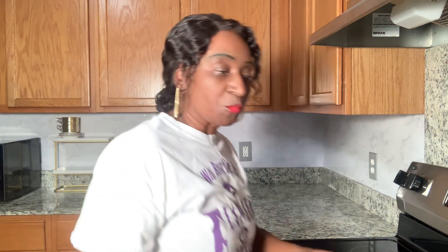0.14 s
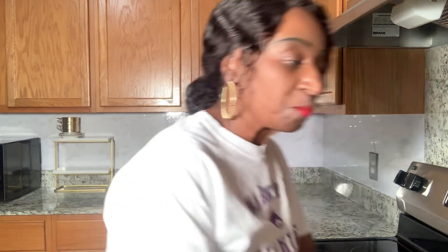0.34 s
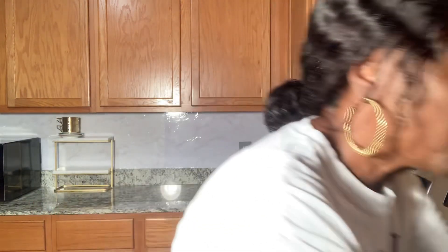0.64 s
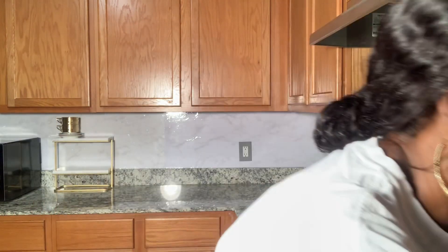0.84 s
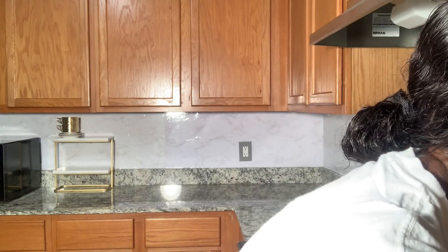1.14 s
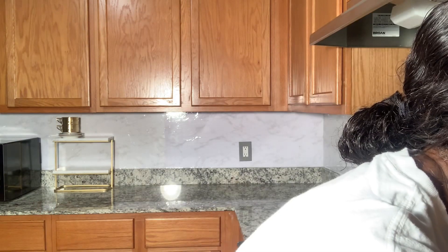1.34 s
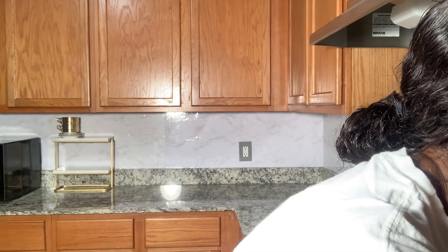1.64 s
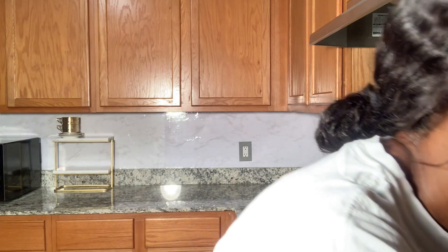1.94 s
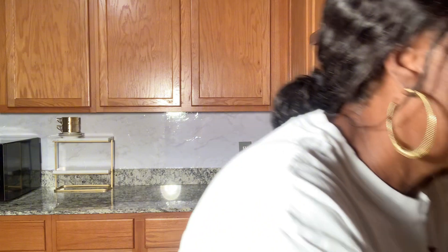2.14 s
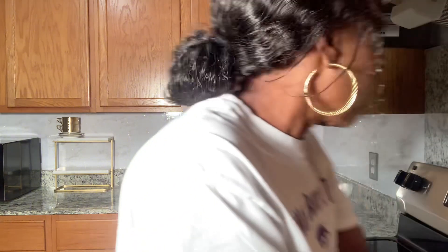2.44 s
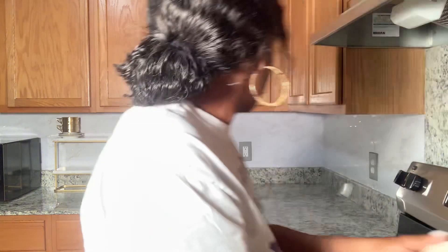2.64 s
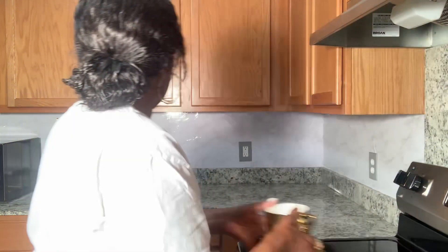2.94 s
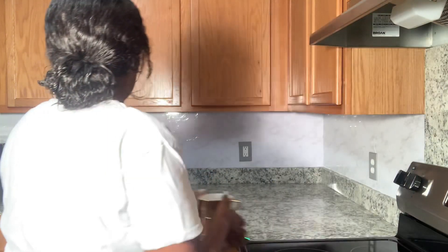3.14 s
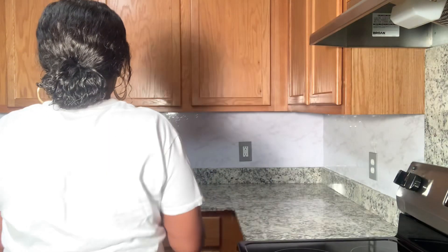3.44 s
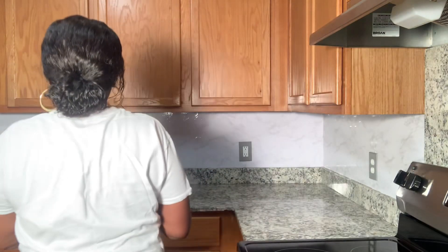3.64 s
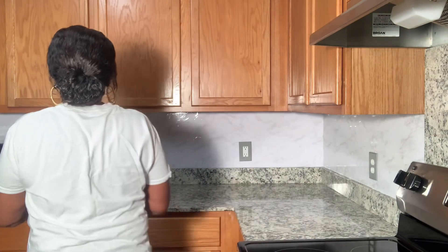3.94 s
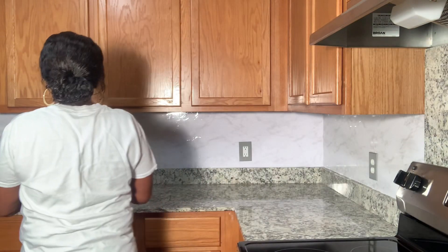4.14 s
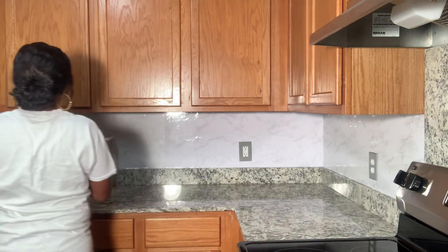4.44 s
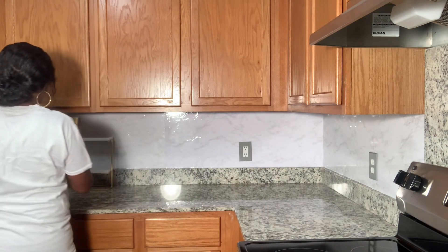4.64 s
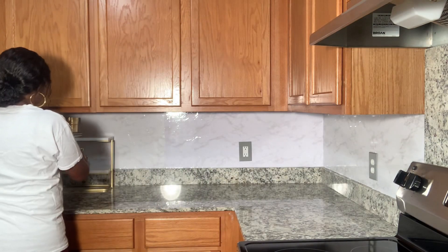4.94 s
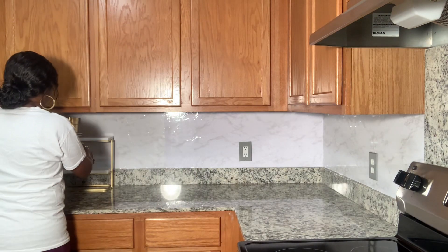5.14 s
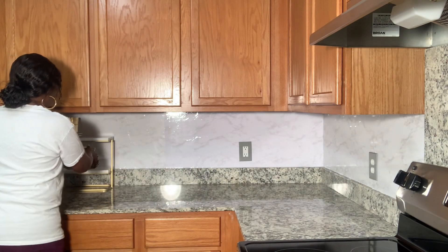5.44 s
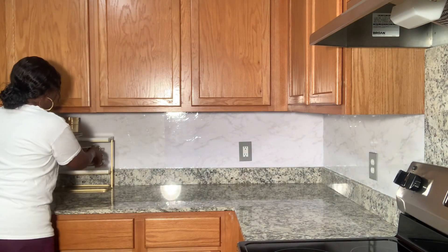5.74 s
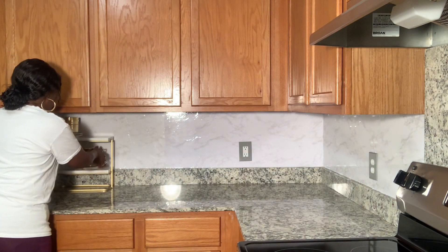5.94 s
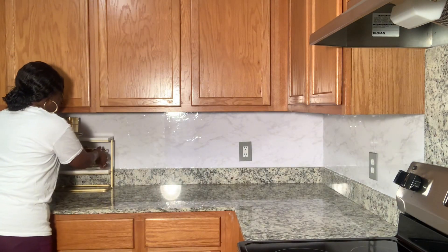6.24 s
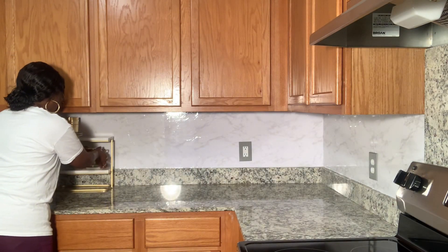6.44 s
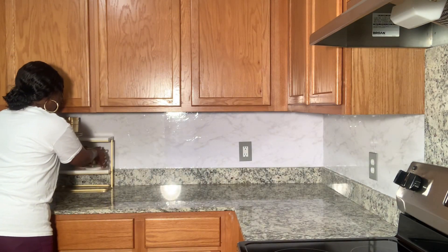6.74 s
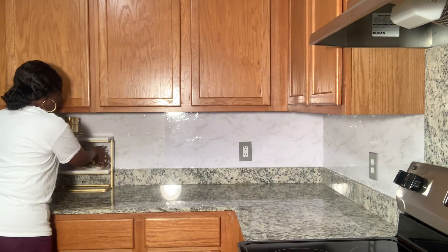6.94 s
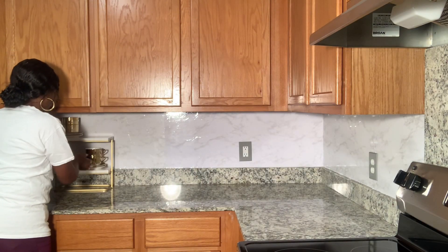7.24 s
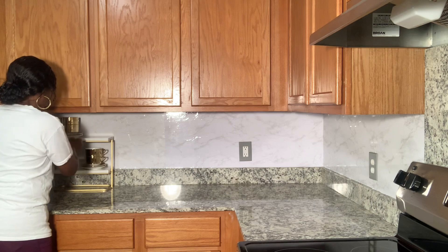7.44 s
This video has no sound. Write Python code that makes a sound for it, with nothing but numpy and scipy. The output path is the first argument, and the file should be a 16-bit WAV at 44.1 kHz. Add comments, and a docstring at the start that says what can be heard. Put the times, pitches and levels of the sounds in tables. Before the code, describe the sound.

Close to a fixed microphone in a small, quiet kitchen, a few dull heel knocks and soft scuffs come with low thuds shaking its support. Cups then clack hard and brightly in a low cupboard. After a lull, gritty slippers shuffle over the hard floor, and finally cups land on a metal stand with a sharp clink and smaller taps.

```python
"""Cups carried across a kitchen

Someone in slippers lifts cups from a low cupboard, shuffles across a hard floor and sets them on a metal stand.
Cups and heels are short blows that make crowds of decaying tones ring; soles scuff as shaped, filtered noise.
The first steps shake the microphone's support as low swaying tones, and a rim rings lightly at the stand.
Noise makes a hush and a low hum that fill the room, and sparse reflections follow the blows and the feet."""
import sys
import numpy as np
from scipy import signal
from scipy.fft import rfft, irfft, next_fast_len
from scipy.io import wavfile
from scipy.ndimage import uniform_filter1d

SR = 44100
rng = np.random.default_rng(int(sys.argv[2]) if len(sys.argv) > 2 else 0)


def master_out(mix):
    """Clip the mix to full scale and print it as 16-bit PCM to the path in sys.argv[1]."""
    frames = np.transpose(np.atleast_2d(mix))
    ceiling = np.clip(frames, -1, 1)
    pcm = np.round(ceiling * 32767).astype(np.int16)
    wavfile.write(sys.argv[1], SR, pcm)


N = 335160  # length in samples, 7.6 s

# Strokes of a sliding sole: (full level reached at [s], build-up [s], slide [s], level [dB], low drag against
# the rub [dB], fine grit against the rub [dB]); the row at 0.32 s is instead the noisy tail of the heel knock
# there
SOLE_STROKES = [(.13, 0.015, .16, -60.5, 7.5, 0.5), (.32, 0.0074, 0.0033, -46.5, 8, -24),
                (0.481, 0.032, 0.01, -63.5, 14, -24), (.26, .03, 0.016, -60, -12, -10),
                (.79, 0.13, .08, -64.5, 3, 4), (0.938, 0.007, .002, -58, 0, -7),
                (1.201, 0.14, 0.084, -74, 13, -16), (1.908, 0.048, 0.077, -58.5, 0, 4),
                (2.46, 0.34, .12, -72, -8, -10.5), (2.65, 0.13, 0.034, -64.5, -14, -10),
                (2.89, 0.019, .02, -51, 1, -1), (2.933, 0.026, 0.033, -39.5, -11.5, 1),
                (2.999, 0.023, 0.019, -43.5, -12, -6), (3.32, 0.11, 0.079, -55, -3, -7.5),
                (3.475, 0.012, 0.021, -45, -9, -0.5), (3.502, .03, .04, -41, -12.5, -8.5),
                (3.63, 0.037, .005, -46, -10.5, -5.5), (3.66, .02, 0.18, -57.5, -1, -5),
                (3.92, 0.13, 0.059, -48, -1, -5), (4.148, 0.025, 0.0038, -42, -17, -6),
                (4.23, 0.055, 0.0039, -40.5, -11.5, -6), (4.49, 0.082, 0.042, -44, -13, -1.5),
                (4.599, 0.017, 0.031, -54.5, 2, -2), (4.878, 0.014, 0.016, -55, 8.5, 5),
                (4.916, 0.034, 0.054, -42, -8.5, -4), (5.09, 0.089, 0.18, -59.5, -2, -5),
                (5.21, .05, 0.03, -60, 3, -0.5), (5.27, .03, 0.0045, -55, 1.5, -5),
                (5.444, 0.02, 0.06, -55, 0.5, 1)]


def gain_of(db):
    """Turns decibels into a factor."""
    return 10 ** (np.asarray(db) / 20)


def evened(x):
    """Scales a signal to an rms of one."""
    return x / np.sqrt(np.mean(x ** 2) + 1e-20)


def read(points, hz):
    """Reads a curve of (frequency, value) points between its points, on a log-frequency axis."""
    f, value = np.transpose(points)
    return np.interp(np.log(hz + 1), np.log(f + 1), value)


def add(mix, s, sound):
    """Mixes a sound in at s seconds, cut off at the end of the mix."""
    part = mix[round(s * SR):][:len(sound)]
    part += sound[:len(part)]


def resonate(x, hz, width):
    """Favours one pitch: shifts it down to zero, smooths, and shifts back; width is in Hz."""
    turn = np.exp(2j * np.pi * hz * np.arange(len(x)) / SR)
    r = np.exp(-np.pi * width / SR)
    smooth = signal.lfilter([1 - r], [1, -r], x / turn)
    return 2 * (turn * smooth).real


def coloured(x, points):
    """Gives x a spectrum of (frequency [Hz], level [dB]) points and an rms of one."""
    size = next_fast_len(len(x))
    gains = gain_of(read(points, np.fft.rfftfreq(size, 1 / SR)))
    return evened(irfft(rfft(x, size) * gains, size)[:len(x)])


def strikes(events, modes, dull_hz, sharp_hz, minor_db, minor_t60, rise, chatter_db, chatter_t60,
            count=240, size=8):
    """A blow is a few tiny impacts spread over the contact time, each waking some modes, then a faint chatter.

    A crowd of minor modes rings beside the main ones; each blow favours low modes, high ones, or one group.
    Here rise and chatter_t60 are in s, and minor_t60 is a share of the main modes' ring time."""
    out, t = np.zeros(N), np.arange(SR // 3) / SR
    hz, db, t60 = np.transpose(modes)
    # minor modes: evenly spaced on a square-root scale, slightly scattered
    minor_hz = np.linspace(np.sqrt(hz[0]), np.sqrt(hz[-1]), count) ** 2
    minor_hz *= np.exp(.004 * rng.standard_normal(count))
    db = np.r_[db, read(np.c_[hz, db], minor_hz) + minor_db]
    t60 = np.r_[t60, read(np.c_[hz, t60], minor_hz) * minor_t60]
    hz = np.r_[hz, minor_hz]

    soft_start = 1 - np.exp(-t / rise)
    decay = np.exp(-np.log(1000) * t / t60[:, None])
    rings = decay * np.sin(2 * np.pi * hz[:, None] * t) * soft_start / np.linalg.norm(gain_of(db))
    grit = rng.standard_normal((len(events), len(t)))
    chance = rng.random((len(events), 2, len(hz)))
    for event, g, (flip, pick) in zip(events, grit, chance):
        s, level_db, dull_db, sharp_db, best_hz, lift_db, contact, damp_db = event
        middle_hz = np.sqrt(dull_hz * sharp_hz)
        lean_db = read([(dull_hz, dull_db), (middle_hz, 0), (sharp_hz, sharp_db)], hz)
        lean_db += lift_db * np.exp(-(np.log(hz / best_hz) / 0.13) ** 2)
        weight = np.sign(flip - .5) * gain_of(level_db + db + lean_db)
        # every mode belongs to one randomly picked impact
        belongs = np.floor(pick * size) == np.arange(size)[:, None]
        impacts = (weight * belongs) @ rings * gain_of(-damp_db * t)
        for k, ring in enumerate(impacts):
            add(out, s + contact * k / size, ring)
        chatter = g * gain_of(-60 * t / chatter_t60) * np.minimum(t / max(contact, 1e-3), 1)
        chatter /= np.linalg.norm(chatter)
        add(out, s, gain_of(chatter_db) * signal.fftconvolve(chatter, impacts.sum(0)))
    return out


def cupboard_lifts():
    """Cups knock in the cupboard, ringing shelf and stacked cups while a hand damps them."""
    # knocks: (time [s], level [dB], dull end [dB], sharp end [dB], favoured pitch [Hz], its lift [dB],
    # contact [s], hand damping [dB/s])
    lift_blows = [(1.263, -15.5, -4, 10, 6000, 6.5, .011, 70),
                  (1.29, -42, -15.5, -3, 2000, -5.5, 0.011, 90),
                  (1.303, -17.5, 5.5, 12.5, 13700, 11, 0.016, 100),
                  (1.385, -38.5, 1.5, -4, 1763, 5, .03, 20), (1.426, -9, -18, -10, 4000, 5.5, 0.0062, 130),
                  (1.431, -5, -6, -14.5, 1730, 0, 0.0072, 110),
                  (1.457, -15.5, -13.5, -18, 3700, 16, 0.0079, 44),
                  (1.623, -36, -12, -22, 1730, -5, 0.0096, 15), (1.745, -53, -2, -22, 1670, 6, 0.0084, 8),
                  (2.026, -36, -21, -46, 1040, 11, 0.0084, 94)]
    # ringing modes of shelf and stacked cups: (frequency [Hz], level [dB], time to fall 60 dB [s])
    shelf_modes = [(166, -6, .14), (250, -22, .1), (366, 3, .11), (528, -14, .1), (944, -18, .1),
                   (1039, -11, .1), (1187, -15, .1), (1400, -17, .1), (1597, -10, .08), (1725, -4, .08),
                   (1790, -11, .15), (1939, -9, .1), (2255, -15, .1), (2510, -16, .1), (2850, -18, .1),
                   (3200, -34, .1), (3640, -20, .12), (4200, -20, .15), (4400, -22, .15), (5240, -32, .12),
                   (5950, -26, .05), (6450, -28, .2), (7900, -60, .1), (9636, -44, .4), (10940, -36, .1),
                   (12500, -52, .1), (13290, -40, .25), (13850, -36, .2), (14050, -37, .2),
                   (15200, -52, .1)]
    return strikes(lift_blows, shelf_modes, dull_hz=400, sharp_hz=6000, minor_db=-7.5, minor_t60=1.0,
                   rise=0.00045, chatter_db=-9.5, chatter_t60=0.27)


def stand_sets():
    """Cups land on the metal stand, and cup and stand ring together."""
    # landings: (time [s], level [dB], dull end [dB], sharp end [dB], favoured pitch [Hz], its lift [dB],
    # contact [s], hand damping [dB/s])
    set_blows = [(6.112, -17.5, -3.5, -2.5, 1584, 1, 0.0068, 210),
                 (6.121, -8, -3.5, 2.5, 1520, 4, 0.0039, 200), (6.138, -15, 0, -3, 1600, -4, .005, 195),
                 (6.256, -29.5, 2.5, 1, 1570, -2, 0.0043, 25), (6.27, -33, 8.5, -18, 2670, 15, .008, 5),
                 (6.38, -55, 7, -8.5, 1500, 2, 0.056, 3), (6.5, -54, -1, 1.5, 1910, 13, 0.058, 3.3),
                 (6.566, -28, -3, -5.5, 1480, -12.5, .015, 85), (6.6, -44, 8.5, -10, 3750, 4.5, 0.047, 4.4),
                 (6.678, -48.5, 4.5, -11.5, 1410, 11, .01, 6), (6.815, -50.5, 2.5, -19, 1100, 10, .02, 8),
                 (6.94, -32.5, 1.5, -7, 1650, -9, 0.0049, 99), (6.98, -49, 13, -9, 1910, -3, .05, 5)]
    # ringing modes of cup and stand: (frequency [Hz], level [dB], time to fall 60 dB [s])
    stand_modes = [(407.7, -21, 0.15), (742, -23, 0.32), (898, -17.5, 0.13), (1100, -15.5, 0.18),
                   (1283, -15, .12), (1460, -4, .15), (1531, -5, .13), (1611, -3, .09), (1670, -2, .08),
                   (1747, -8, .15), (1957, -14, .13), (2040, -15, .12), (2229, -22, .12), (2772, -13, .15),
                   (2955, -10, .17), (3290, -12, .15), (3536, -10, .16), (3675, -12, .16), (4060, -17, .15),
                   (4500, -22.5, .15), (5000, -34, 0.12), (6314, -25.5, .15), (6440, -45.5, 0.72),
                   (6720, -31.5, 0.087), (7100, -50.5, 0.081), (8900, -52.5, 0.052), (13440, -41.5, .04)]
    return strikes(set_blows, stand_modes, dull_hz=810, sharp_hz=3556, minor_db=-7, minor_t60=0.95,
                   rise=0.00062, chatter_db=-7.5, chatter_t60=0.15)


def rim_ping():
    """A lightly touched thin rim rings alone as a few soft-starting, decaying tones."""
    # tones of the rim: (frequency [Hz], level against ping_db [dB], time to fall 60 dB [s])
    rim_tones = [(5030, -10, .3), (5600, 0, .08), (5700, 1, .09), (5800, -1, .07)]
    ping_s, ping_db = 6.941, -50
    out, t = np.zeros(N), np.arange(SR // 2) / SR
    soft_start = 1 - np.exp(-t / 0.0044)
    for hz, db, t60 in rim_tones:
        loudness = gain_of(ping_db + db - 60 * t / t60)
        add(out, ping_s, loudness * soft_start * np.sin(2 * np.pi * hz * t))
    return out


def pressure(extra_db, fade_db_per_s):
    """Loudness of the strokes: each builds up, slides and fades; overlapping strokes add in power."""
    build_db = 22  # a stroke builds up from this far below its level, and from lower still before that
    power, t = np.zeros(N), np.arange(-SR // 2, SR // 2) / SR
    for (s, build, slide, level_db, *_), extra in zip(SOLE_STROKES, extra_db):
        rise_db = build_db * np.minimum(t, 0) / build
        shape_db = rise_db - fade_db_per_s * np.maximum(t - slide, 0)
        first = max(SR // 2 - round(s * SR), 0)  # skip what would come before the start
        add(power, max(s - .5, 0), gain_of(level_db + extra + shape_db)[first:] ** 2)
    return np.sqrt(power)


def scuffs():
    """Dense grit under the sole: a rub, with a low drag from weight and an airy hiss from fine grit.

    The hollow of the slipper resonates and so colours some strokes."""
    # colour of the grit under the sole: (frequency [Hz], relative level [dB])
    sole_colour = [(150, -22), (250, 5), (620, -4.5), (805, -7.5), (878, -6), (1380, -9.5), (1990, -3),
                   (4610, -3.5), (6310, -4), (7780, -12), (8790, -18.5), (11600, -14.5), (15100, -12),
                   (16200, -26)]
    # strokes where the hollow sings: (middle [s], half length [s], pitch [Hz], level over the rub [dB])
    hollow_strokes = [(0.166, 0.027, 1580, 9), (2.5, 0.19, 2900, -2.5), (2.956, 0.011, 1700, 3),
                      (3.504, 0.064, 2680, -2), (3.622, 0.018, 3240, 0.5), (3.82, 0.035, 2300, -1),
                      (3.978, 0.068, 2830, 1.5), (4.294, 0.063, 2950, -5.5), (5.28, 0.011, 1700, 6.5)]
    drag_db, grit_db = np.transpose(SOLE_STROKES)[4:]
    slips = evened(uniform_filter1d(rng.standard_normal(N), size=300))
    bursts = np.minimum(rng.exponential(1, N), 5)
    grits = rng.standard_normal((4, N)) * gain_of(1.8 * slips + 2.0 * bursts)
    layers = []
    for band, grit in zip([(250, 1500), (1500, 8800), (8800, 19000)], grits):  # Hz
        sos = signal.butter(2, band, "bandpass", fs=SR, output="sos")
        layers.append(evened(signal.sosfilt(sos, coloured(grit, sole_colour))))
    drag, rub, hiss = layers

    # the colour of the rub shifts in patches of time and pitch
    _, _, z = signal.stft(rub, SR, nperseg=512)
    patches = uniform_filter1d(rng.standard_normal(z.shape), size=8, axis=0)
    patches = evened(uniform_filter1d(patches, size=8, axis=1))
    rub = evened(signal.istft(z * gain_of(2.7 * patches), SR, nperseg=512)[1][:N])

    for middle, half, hz, share_db in hollow_strokes:
        # twice the half length, as the smooth window fades at both ends
        span = slice(round((middle - 2 * half) * SR), round((middle + 2 * half) * SR))
        sung = evened(resonate(resonate(grits[3, span], hz, 300), hz, 480))
        add(rub, middle - 2 * half, gain_of(share_db) * sung * np.hanning(len(sung)))

    # after the slide the hiss dies first, the drag last
    sound = pressure(np.zeros(len(SOLE_STROKES)), fade_db_per_s=220.5) * rub
    sound += pressure(drag_db, fade_db_per_s=147.5) * drag
    return sound + pressure(grit_db, fade_db_per_s=379.5) * hiss


def snaps():
    """Single grains snap under the sole, each a bright noise click about a millisecond long."""
    # snapping grains: (time [s], level [dB])
    grain_snaps = [(2.929, -19.5), (3.47, -38), (4.139, -34), (4.437, -43), (4.487, -19), (4.539, -35)]
    out, t = np.zeros(N), np.arange(400) / SR
    for (s, db), grit in zip(grain_snaps, rng.standard_normal((len(grain_snaps), 400))):
        click = np.diff(np.sign(grit) * np.exp(-t / 0.00068), prepend=0) / 2  # differences favour treble
        add(out, s, gain_of(db) * click)
    return out


def heel_knocks():
    """Heels and small bumps knock on the hard floor with short, dull rings."""
    # knocks: (time [s], level [dB], dull end [dB], sharp end [dB], favoured pitch [Hz], its lift [dB])
    heel_blows = [(.129, -31, -17, 1, 1790, 11), (.163, -23.5, -2.5, -3, 394, -4),
                  (.319, -21, 0.5, 13.5, 1250, 5.5), (.478, -49.5, 18, -15, 484.4, 10.5),
                  (.547, -28.5, -4, 4.5, 540, 10), (.938, -28.5, -10.5, 5, 416, 16),
                  (2.884, -29.5, 3, 4, 536, 14.5), (4.184, -34, 4, -11, 430, 4.5),
                  (4.602, -27.5, -14, 2, 1250, 0), (4.637, -40, 13.5, 10, 400, -2),
                  (4.872, -23, 4.5, 13, 523, 7.5), (5.438, -28.5, 8.5, -18, 587, 8)]
    # ringing modes of heel and floor: (frequency [Hz], level [dB], time to fall 60 dB [s])
    heel_modes = [(195.5, -3.5, 0.066), (310, -12.5, 0.11), (430, 4.5, 0.023), (584, 1.5, 0.023),
                  (852, -9.5, 0.025), (1250, -4, 0.021), (1700, -13, 0.011), (2500, -16.5, 0.034),
                  (3260, -18, 0.0089), (4910, -43, 0.013), (7090, -47, 0.01), (11720, -59, 0.0086)]
    contact_s, damp_db_per_s = .007, 1.5
    events = [tuple(row) + (contact_s, damp_db_per_s) for row in heel_blows]
    return strikes(events, heel_modes, dull_hz=448, sharp_hz=2510, minor_db=-5, minor_t60=0.87,
                   rise=0.0011, chatter_db=-10.5, chatter_t60=0.2, count=120)


def support_shakes():
    """Steps make the support sway, each as one low, soft-starting tone that dies away."""
    # sways: (time [s], level [dB], pitch [Hz], time to fall 60 dB [s])
    sways = [(0.117, -33, 62, 0.33), (.155, -21, 59.2, 0.49), (0.333, -20, 62, 0.35), (.37, -19, 62, .2),
             (.49, -34, 62, 0.41), (0.55, -29.5, 62, 0.45)]
    out, t = np.zeros(N), np.arange(SR) / SR
    soft_start = 1 - np.exp(-t / 0.0028)
    for s, db, hz, t60 in sways:
        add(out, s, gain_of(db - 60 * t / t60) * soft_start * np.sin(2 * np.pi * hz * t))
    return out


def kitchen(x):
    """The room answers with sparse reflections of random sign, each band dying at its own speed."""
    # how long the room rings: (frequency [Hz], time to fall 60 dB [s])
    room_decay = [(150, 0.13), (500, 0.15), (1500, 0.5), (4000, 0.39), (8000, 0.51), (15000, 0.4)]
    taps = np.zeros(SR)
    at = np.arange(120, SR - 20, 20)
    taps[at + rng.integers(0, 20, len(at))] = rng.choice([-1., 1.], len(at))
    hz, t, z = signal.stft(taps, SR, nperseg=256)
    fade = gain_of(-60 * t / read(room_decay, hz)[:, None])
    tail = signal.istft(z * fade, SR, nperseg=256)[1]
    return signal.fftconvolve(x, tail / np.linalg.norm(tail))[:N]


def room_tone():
    """Filtered noise makes a steady hush with a slight flutter, and a wavering low hum."""
    # colour of the hush: (frequency [Hz], relative level [dB])
    hush_colour = [(12, -90.5), (20, -45.5), (60, -10), (150, -21.5), (222, 0.5), (270, -8.5), (513, -22),
                   (624, -28.5), (2320, -41), (2990, -34), (3630, -45), (4060, -45.5), (8890, -47.5),
                   (13900, -43.5), (16000, -47)]
    # swell of the low hum, before a lift of 3 dB: (time [s], level [dB])
    hum_swell = [(0.9, -51), (1.12, -56.5), (1.79, -59), (1.9, -50.5), (2.5, -59), (5.95, -59.5),
                 (6.08, -54.5), (7.6, -58.5)]
    hush_db, hum_hz = -53, 62
    t = np.arange(N) / SR
    flutter = evened(uniform_filter1d(rng.standard_normal(N), size=3000))
    waver = uniform_filter1d(rng.standard_normal(N), size=5000)
    waver = evened(uniform_filter1d(waver, size=5000))
    hush = gain_of(hush_db + 0.53 * flutter) * coloured(rng.standard_normal(N), hush_colour)
    hum = evened(resonate(resonate(rng.standard_normal(N), hum_hz, 30), hum_hz, 140))
    hum_db = np.interp(t, *np.transpose(hum_swell)) + 3.0 + 1.8 * waver
    return hush + gain_of(hum_db) * hum


def scene():
    """Adds all sources; cups, heels and soles each send their own share into the room."""
    lifts = cupboard_lifts()
    sets = stand_sets() + rim_ping()
    feet = scuffs() + snaps()
    heels = heel_knocks()
    wet = gain_of(-14.0) * lifts + gain_of(-10.5) * sets + gain_of(-18.0) * feet + gain_of(-5.5) * heels
    return (lifts + sets + feet + heels + support_shakes() + kitchen(wet) + room_tone())[None]


def record(dry):
    """The small microphone loses the deepest bass and has a dip near 9 kHz; then the top is cut off."""
    thinned = signal.lfilter(*signal.butter(2, 40, "highpass", fs=SR), dry)
    dipped = signal.lfilter(*signal.iirnotch(8900, 4., SR), thinned)
    top_cut = signal.firwin(511, 15900, window=("kaiser", 9), fs=SR)  # edge in Hz
    return signal.oaconvolve(dipped, top_cut[None], "same")


dry = scene()
out = record(dry)
master_out(out)
```